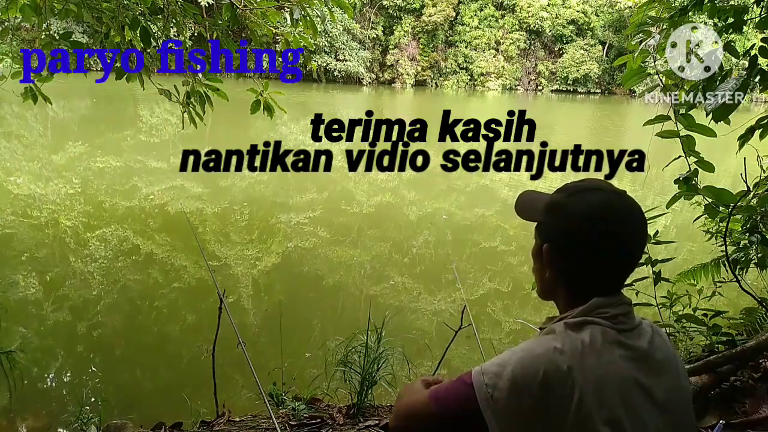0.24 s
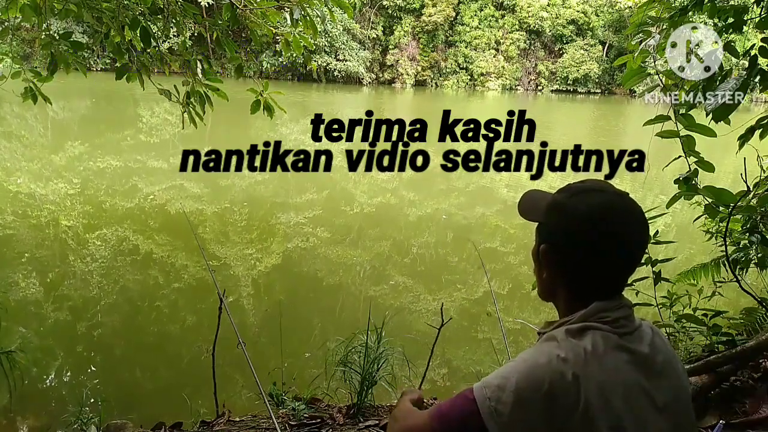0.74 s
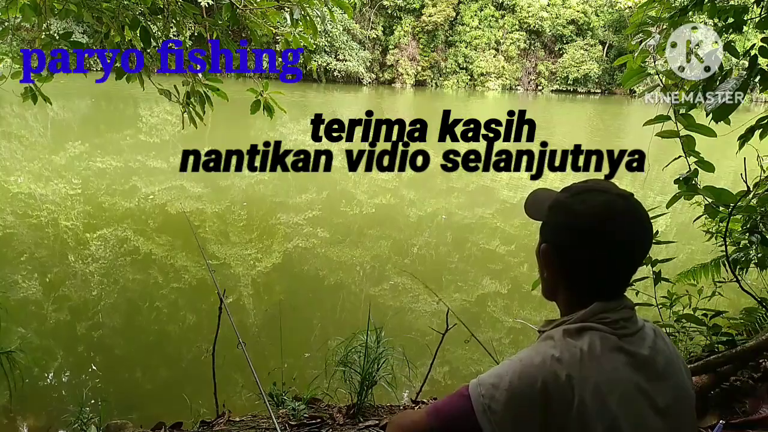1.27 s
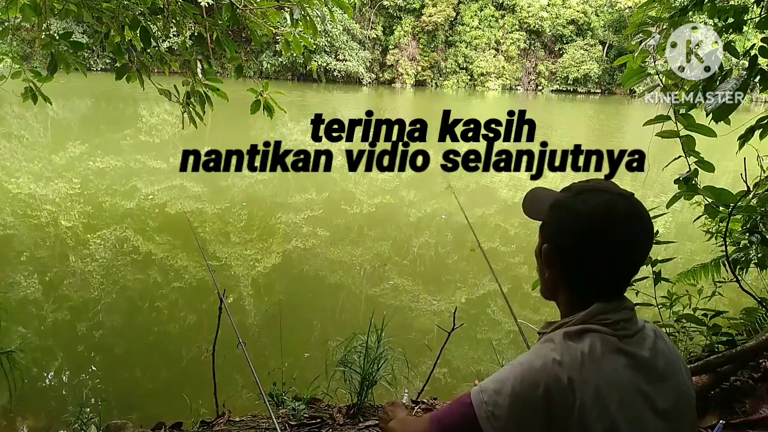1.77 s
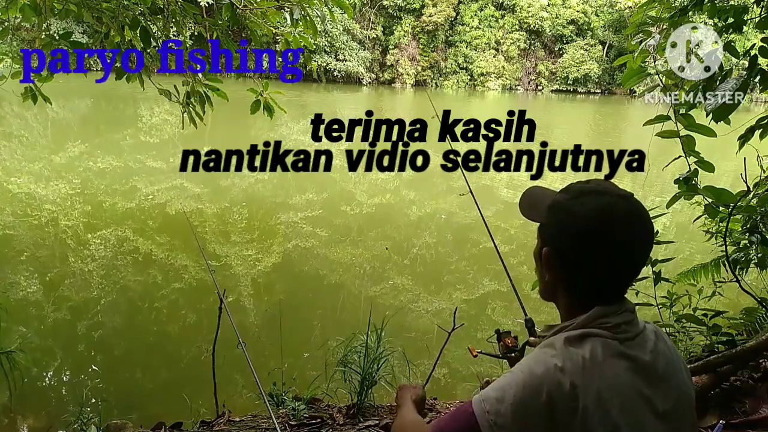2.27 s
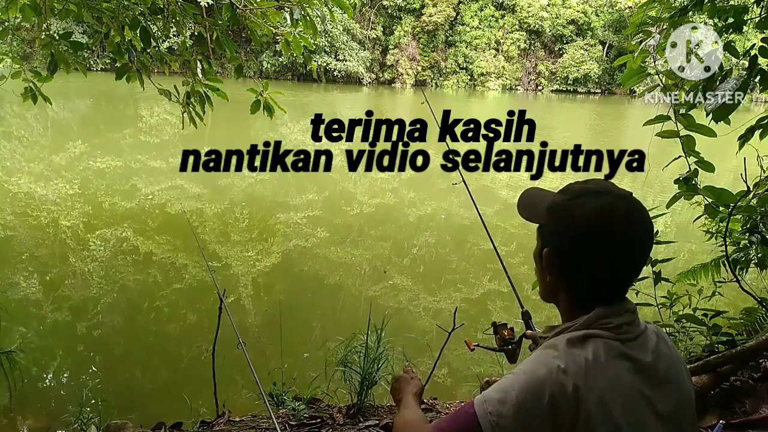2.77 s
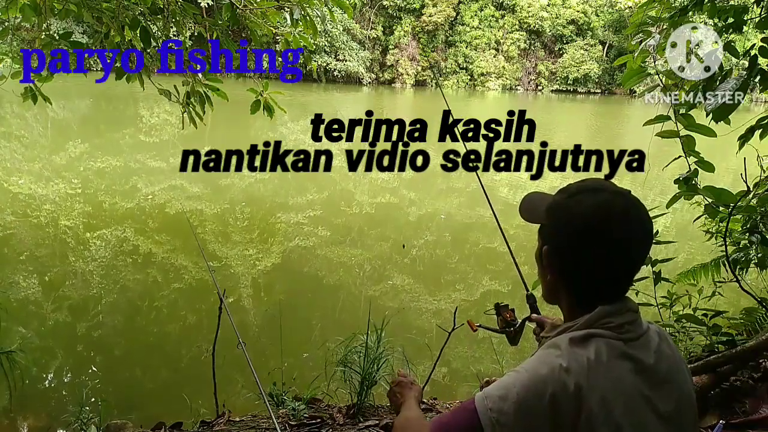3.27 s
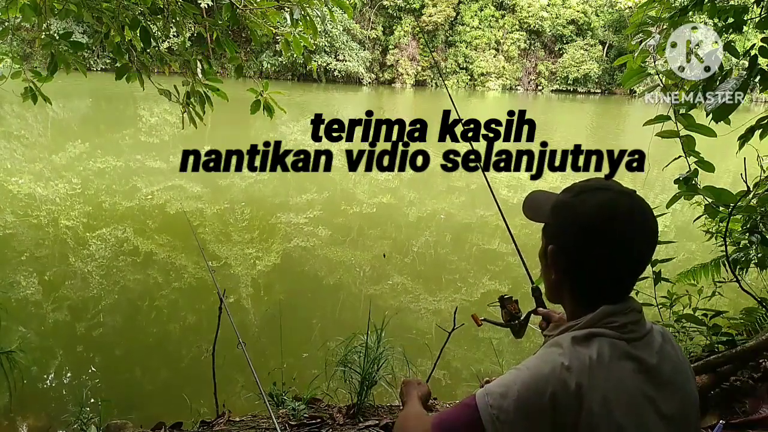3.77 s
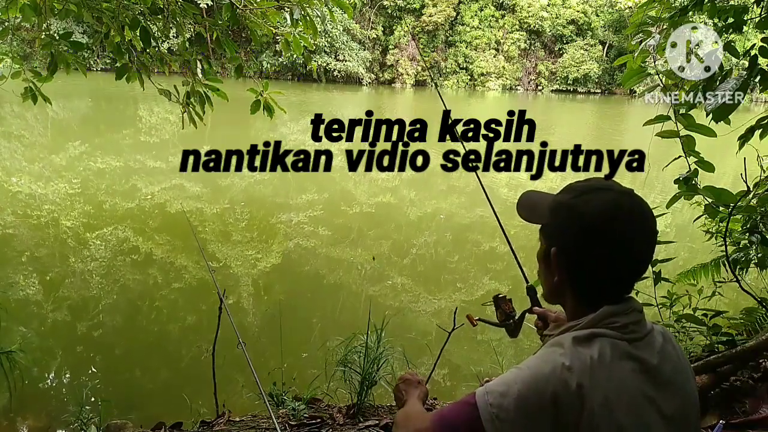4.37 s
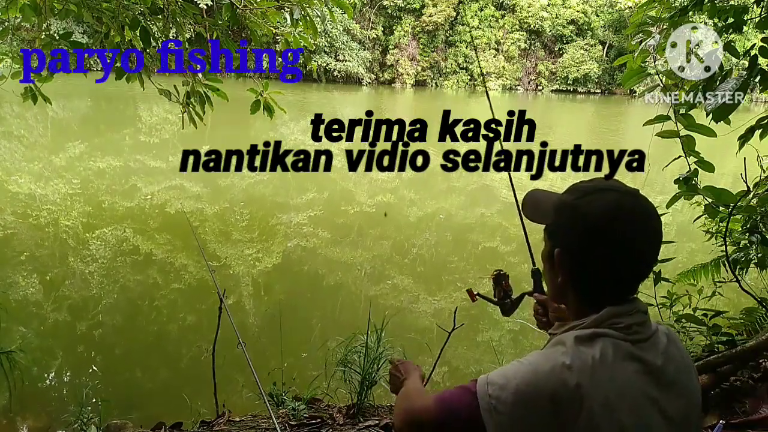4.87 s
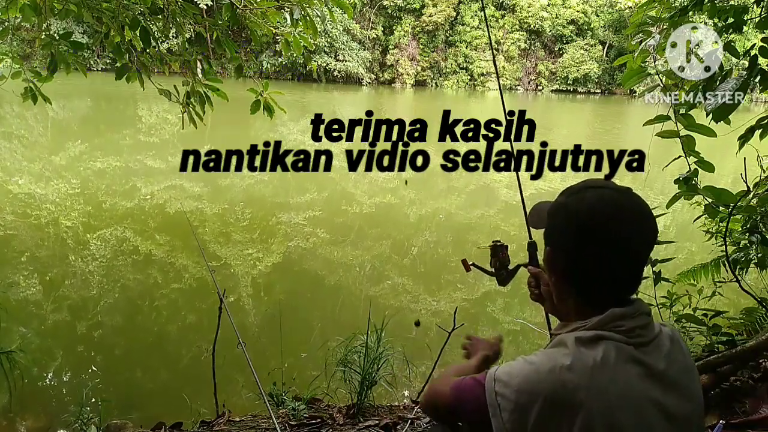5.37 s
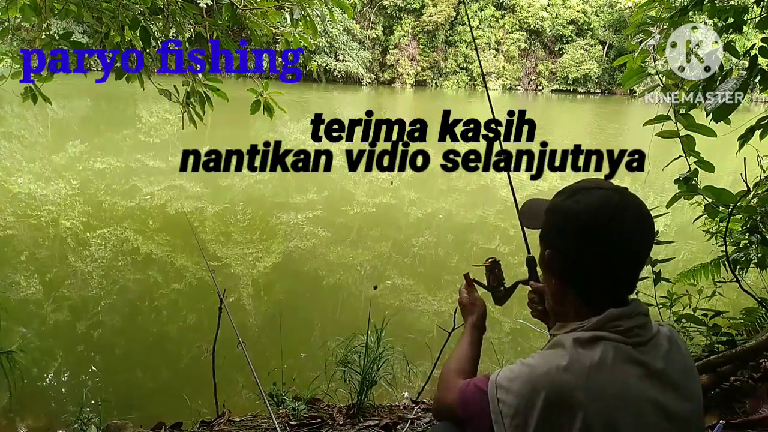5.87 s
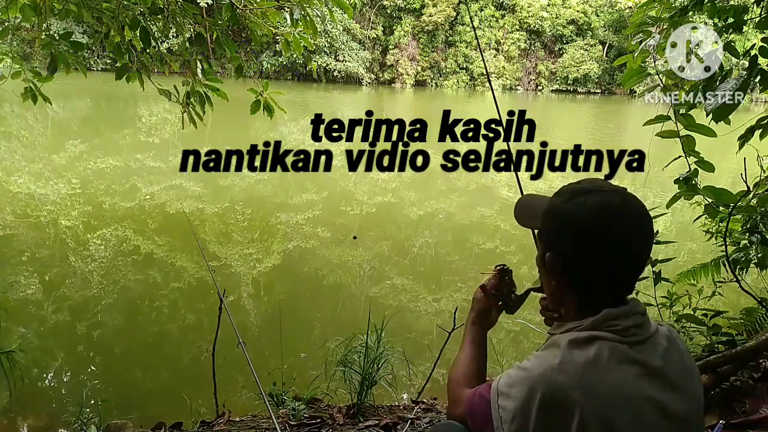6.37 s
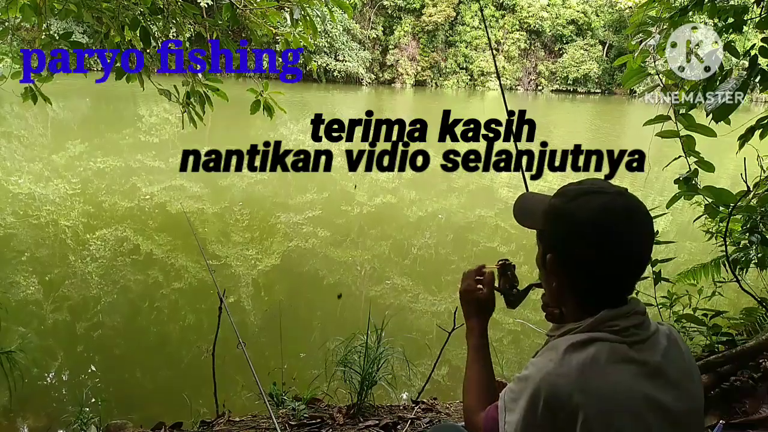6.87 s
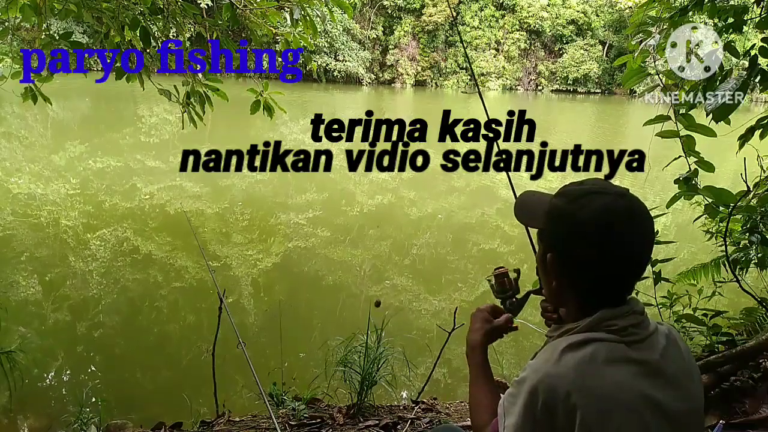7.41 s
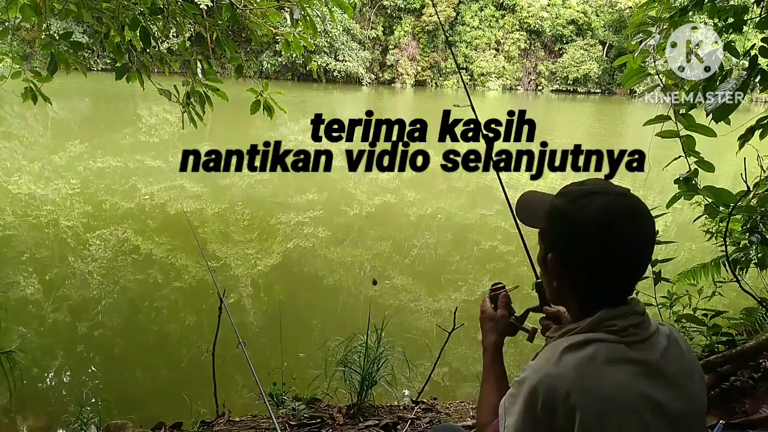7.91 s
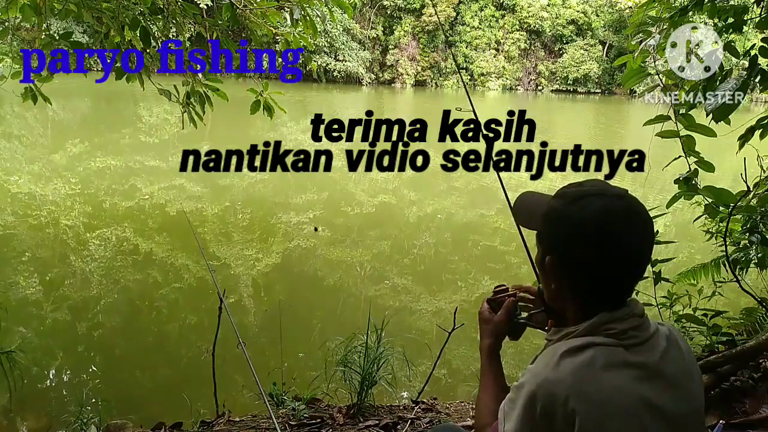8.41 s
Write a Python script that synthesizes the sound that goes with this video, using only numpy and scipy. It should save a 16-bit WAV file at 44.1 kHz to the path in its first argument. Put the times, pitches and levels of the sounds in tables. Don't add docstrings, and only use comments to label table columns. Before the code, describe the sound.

A continuous insect bed surrounds a lake shore: smooth cricket tones, a raspy cicada buzz and very high thin katydid whine. A small bird repeats a chip followed by a buzzy falling whistle about every 1.3 seconds, echoing off trees. A fishing rod close by ticks early, flicks and creaks around two to three and a half seconds, then ticks again later. Faint low wind rumble reaches the phone-like stereo microphone.

```python
import sys
import numpy as np
from scipy import signal
from scipy.fft import rfft, irfft, next_fast_len
from scipy.io import wavfile
from scipy.ndimage import map_coordinates

SR = 44100
rng = np.random.default_rng(int(sys.argv[2]) if len(sys.argv) > 2 else 0)


def store_wav(level_fs):
    pcm = np.round(np.clip(np.atleast_2d(level_fs), -1, 1) * 32767)
    wavfile.write(sys.argv[1], SR, pcm.T.astype(np.int16))


def elevation(decibels):
    levels = np.asarray(decibels, float)
    return 10 ** (levels / 20)


N = 381465


def clock():
    return np.arange(N) / SR


def unit(x):
    return x / np.sqrt(np.mean(np.abs(x) ** 2) + 1e-20)


def along(points, hz):
    f, v = np.transpose(points)
    return np.interp(np.log(hz + .1), np.log(f + .1), v)


def curves(rows):
    s, *cols = np.transpose(rows)
    return [np.interp(clock(), s, c) for c in cols]


def gate(rows, fade):
    t = clock()
    return np.clip(np.minimum(t - rows[0][0], rows[-1][0] - t) / fade, 0, 1)


def coarse(rate, channels=1):
    knots = rng.standard_normal((channels, 4096))
    at = np.arange(0, N + 16, 16) * rate / SR
    return np.array([map_coordinates(k, [at], order=2, mode="wrap") for k in knots])


def wobble(rate, channels=1):
    return np.repeat(coarse(rate, channels), 16, axis=1)[:, :N]


def filtered(x, response):
    m = next_fast_len(N + SR // 2)
    return irfft(rfft(x, m) * response(np.fft.rfftfreq(m, 1 / SR)), m)[..., :N]


def noise(spectrum, alike=0., lead=0.):
    own, common = rng.standard_normal((2, N)), rng.standard_normal(N)
    share = np.clip(alike, 0, 1)
    turn = np.exp(.5j * lead * np.array([[-1], [1]]))
    both = filtered(np.array([common, common]), lambda hz: elevation(along(spectrum, hz)) * turn)
    apart = filtered(own, lambda hz: elevation(along(spectrum, hz)))
    return unit(np.sqrt(share) * both + np.sqrt(1 - share) * apart)


def turns(hz):
    return 2 * np.pi * np.cumsum(np.broadcast_to(hz, N)) / SR


def wings(hz, db, scatter_hz, strokes=0, depth=0, pan_db=0, direct=0):
    a = coarse(scatter_hz, channels=4)
    share = np.clip(direct, 0, 1)
    leafy = unit(a[:2] + 1j * a[2:])
    straight = np.exp(1.2j * coarse(9, channels=2))
    paths = np.sqrt(1 - share) * leafy + np.sqrt(share) * straight
    stroke_rate = strokes * (1 + .03 * coarse(2)[0])
    paths *= 1 + depth * np.sin(2 * np.pi * np.cumsum(stroke_rate) * 16 / SR)
    paths = unit(paths) * elevation(pan_db * np.array([[.5], [-.5]]))
    paths = np.repeat(paths, 16, axis=1)[:, :N]
    return (paths * (np.sqrt(2) * elevation(db) * np.exp(1j * turns(hz)))).real


# frequency in Hz, t60 in seconds.
FOREST_T60 = [(500, 0.9), (4000, 1), (9000, 0.13)]


def forest(x, length=SR):
    hz, t, z = signal.stft(rng.standard_normal((2, length)), SR, nperseg=256)
    decay = elevation(-60 * t / along(FOREST_T60, hz)[:, None])
    tail = signal.istft(z * decay, SR, nperseg=256)[1]
    return signal.fftconvolve(x[None], tail / np.linalg.norm(tail[0]), axes=1)[:, :N]


# time in seconds, strength in dB.
BREEZE = [
    (0, -54.5),
    (1.4, -55),
    (2.2, -56),
    (3.4, -53.5),
    (4.8, -54.5),
    (5.6, -56),
    (7.4, -55),
    (8.65, -54),
]
# frequency in Hz, density in dB per Hz.
BUFFET_SPECTRUM = [(1, -12), (4, -9), (10, -13), (20, -15.5), (40, -41), (80, -46), (200, -120)]
RUMBLE_SPECTRUM = [(10, -43.5), (25, -2.5), (45, 1.5), (62, 2.5), (90, -7.5), (140, -20), (250, -37.5),
                   (500, -120)]
RUSTLE_SPECTRUM = [(40, -30), (110, 0), (200, -4.5), (450, -9.5), (800, -19), (1200, -24), (2000, -31.5),
                   (4000, -120)]
FAR_CHORUS_SPECTRUM = [(500, -39), (1200, -11), (2000, -4.5), (2700, -3), (3400, 0), (4100, -3), (4600, -5),
                       (5700, -7), (8600, -3), (9000, 0.5), (9500, -2.5), (10600, -11), (11800, -28),
                       (13900, -24)]
# frequency in Hz, left over right in dB.
PORT_BALANCE = [(20, -2), (100, -3), (400, -0.5), (4000, -0.5), (8500, 0.5), (10000, -2), (14000, 5.5)]


def air():
    strength_db = curves(BREEZE)[0]
    gust_db = strength_db - strength_db.mean()
    buffet_db = -45.5 + 0.66 * gust_db
    rumble_db = -53.5 + gust_db
    rustle_db = -61 + 0.25 * gust_db - 0.27 * clock()
    out = elevation(buffet_db) * noise(BUFFET_SPECTRUM)
    out += elevation(rumble_db) * noise(RUMBLE_SPECTRUM, alike=0.55, lead=0.71)
    out += elevation(rustle_db + .6 * wobble(4.4)) * noise(RUSTLE_SPECTRUM, alike=0.11)
    out += elevation(-62 + 0.86 * wobble(9, channels=2)) * noise(FAR_CHORUS_SPECTRUM)
    return filtered(out, lambda hz: elevation(along(PORT_BALANCE, hz) * np.array([[.5], [-.5]])))


KATYDID_HZ = [12960, 13180, 13425, 13645, 13835, 13900, 14010, 14190, 14240, 14505, 14690, 14950]
# level in dB, scatter in Hz.
KATYDID_LINES = [(-98, 250), (-96, 120), (-88, 70), (-83, 50), (-90, 70), (-92, 70), (-93, 90), (-83, 40),
                 (-84, 40), (-95, 140), (-98, 140), (-100, 250)]
# time in seconds, lift in dB.
FLARES = [
    (.5, 6),
    (1.9, 12),
    (7, 10),
    (8.65, 12),
]


def katydids():
    t, level_db, flare_s = clock(), 2.5, 0.61
    low_db = -5 + sum(db * np.exp(-((t - s) / flare_s) ** 2) for s, db in FLARES)
    out = np.zeros((2, N))
    for hz, (line_db, scatter_hz) in zip(KATYDID_HZ, KATYDID_LINES):
        lift = low_db * np.clip((13600 - hz) / 400, 0, 1)
        drifting_hz = hz + 28 * wobble(1.0)[0]
        db = level_db + line_db + lift + 1.5 * wobble(1.8)[0]
        out += wings(drifting_hz, db, scatter_hz, pan_db=-2.0, direct=0.19)
    return out


CRICKET_HZ = [2945, 2968, 2995, 3020, 3048, 3353, 3407, 3456, 3547, 3606, 3676]
# level in dB, scatter in Hz, strokes per second, stroke depth 0-1,
# left over right in dB, direct share 0-1.
CRICKET_TONES = [(-74, 45, 0, 0, 0, 0), (-68, 40, 18, .2, 0, 0), (-70, 50, 0, 0, 0, 0),
                 (-70, 45, 41, .2, 0, 0), (-74, 45, 0, 0, 0, 0), (-78.5, 25, 0, 0, 2, .5),
                 (-77, 35, 0, 0, 2, .4), (-76.5, 30, 0, 0, 2, .45), (-71.5, 24, 26.4, .3, .4, .7),
                 (-83, 30, 0, 0, 0, .1), (-81, 40, 0, 0, 0, .1)]
# wing tone in Hz, creep in Hz per second, first level in dB, settled level in dB.
TREE_CRICKETS = [
    (5255, 14, -66.5, -86),
    (5325, -1, -76, -81),
    (5120, 10, -84, -80),
    (5070, 5, -88, -81),
]
# start in seconds, attack in seconds, tone in Hz, climb in Hz per second, level in dB,
# swell in dB per second.
LATE_SINGER = (8.0, .1, 12780, 450, -86, 9)


def crickets():
    t = clock()
    out = elevation(3) * sum(wings(hz, *row) for hz, row in zip(CRICKET_HZ, CRICKET_TONES))

    settle_s, rest_at_s, rest_s = 3, 4.9, .7
    rest_db = -4 * np.exp(-((t - rest_at_s) / rest_s) ** 2)
    singers = []
    for tone_hz, creep, first_db, settled_db in TREE_CRICKETS:
        hz = tone_hz + creep * np.minimum(t, 6)
        singers.append((hz, settled_db + (first_db - settled_db) * np.exp(-t / settle_s)))
    (near_hz, near_db), *far = singers
    out += wings(near_hz, near_db, scatter_hz=30, strokes=9.3, depth=.65, pan_db=6, direct=.85)
    out += sum(wings(hz, db + rest_db, scatter_hz=45, pan_db=4, direct=.3) for hz, db in far)

    waver_from_s, waver_s, climb_s = 1.87, 1.645, 1.0
    dip = np.sin(np.pi * np.maximum(t - waver_from_s, 0) / waver_s) ** 2
    siren_hz = 9275 - 150 * np.maximum(1 - t / climb_s, 0) - 135 * dip - 11 * t
    siren_db = np.interp(t, [0, 3.8], [-68.5, -63.5])
    out += wings(siren_hz, siren_db, scatter_hz=120, pan_db=-1.5)

    start_s, attack_s, hz, climb, db, swell = LATE_SINGER
    since = np.maximum(t - start_s, 0)
    late = wings(hz + climb * since, db + swell * since, scatter_hz=597, pan_db=-4)
    return out + np.minimum(since / attack_s, 1) * late


# frequency in Hz, density in dB per Hz.
CICADA_BODY = [(5000, -71), (6000, -41), (6600, -7), (7000, 0), (7400, 4), (7750, -0.5), (8100, -6),
               (8500, -32), (9500, -35), (12000, -120)]


def cicada():
    cycle = turns(19.6 * (1 + 0.0042 * wobble(0.96)[0]))
    bursts = 1 + .5 * np.cos(cycle) + .5 * np.cos(4 * cycle) + 0.3 * np.cos(5 * cycle + 1)
    clicks = bursts * rng.standard_normal(N) * (rng.random(N) < 1500 / SR)
    straight = 0.76 * unit(clicks) * np.array([[1], [.3]])
    scattered = unit(forest(clicks, SR // 2))
    blend = straight + scattered + 1.52 * rng.standard_normal((2, N))
    body = unit(filtered(blend, lambda hz: elevation(along(CICADA_BODY, hz))))
    return body * elevation(-57 + 0.4 * wobble(12, channels=2)) * elevation([[1.5], [-1.5]])


# time of the downward step in seconds, time held before it in seconds,
# held pitch in Hz, held level in dB, low level in dB.
WHISTLES = [
    (.485, 0.19, 4302, -55, -56),
    (1.792, .29, 4163, -56.5, -60.5),
    (2.889, .27, 4194, -62, -56.5),
    (4.19, 0.21, 4172, -57.5, -62),
    (5.48, 0.22, 4140, -62.5, -58.5),
    (6.871, 0.18, 4120, -67, -60),
    (8.53, .08, 3980, -60, -60.5),
]
# start in seconds, pitch in Hz, bend in Hz, level in dB.
CHIPS = [(.033, 3780, 0, -58), (1.3, 3760, -70, -61), (1.303, 2700, -80, -66), (2.398, 3760, 150, -56),
         (3.74, 3790, -20, -56), (5.09, 3850, -60, -63), (5.08, 3250, -150, -70), (6.488, 2650, -50, -63),
         (6.501, 3250, 350, -61), (8.156, 3720, -20, -63), (.01, 3150, 0, -65)]
# start in seconds, note 0 low or 1 high, level in dB.
ANSWERS = [
    (3.384, 0, -68),
    (3.467, 1, -67),
    (3.567, 0, -62.5),
    (3.676, 1, -64),
    (8.43, 0, -68),
    (8.52, 1, -62),
    (8.607, 0, -63),
]


def birds():
    t, song = clock(), np.zeros(N)
    beat = 1 + .6 * np.cos(turns(112 * (1 + .06 * wobble(20)[0])))
    buzz = beat * elevation(2.7 * wobble(40)[0])
    warble_hz, waver = 60 * wobble(80)[0], wobble(350)[0]

    def sing(hz):
        return np.sin(2 * np.pi * np.cumsum(hz) / SR)

    step_s, swell_s, low_hold_s = .025, .11, .07
    for s, held, hz, held_db, low_db in WHISTLES:
        on = (t > s - held) & (t < s + .2)
        u = t[on] - s
        low = .5 + .5 * np.tanh(u / step_s)
        young = np.clip(1 - (u + held) / swell_s, 0, 1)
        pitch = hz - 30 * young - 240 * low - 800 * np.maximum(u, 0)
        db = held_db + (low_db - held_db) * low - 13 * young
        db -= 260 * np.maximum(u - low_hold_s, 0)
        attack = np.minimum((u + held) / 0.0086, 1)
        song[on] += attack * elevation(db) * buzz[on] * sing(pitch + warble_hz[on])

    calls = [(s, .043, hz, bend, db, 120) for s, hz, bend, db in CHIPS]
    calls += [(s, .087, 3190 if high else 2775, 0, db, 50) for s, high, db in ANSWERS]
    for s, length, hz, bend, db, spread_hz in calls:
        on = (t > s) & (t < s + length)
        u = (t[on] - s) / length
        envelope = np.clip(np.minimum(u, 1 - u) * length / 0.015, 0, 1)
        song[on] += envelope * elevation(db + 3.0) * sing(hz + bend * u + spread_hz * waver[on])

    straight = song * elevation([[-2], [-6]])
    return elevation(0.5) * (straight + elevation(-1) * forest(song))


# time in seconds, pitch in Hz, level in dB.
FLICK = [
    (2.1, 2880, -77),
    (2.118, 2716, -65.5),
    (2.135, 2100, -65),
    (2.155, 1660, -65),
    (2.19, 1574, -83),
    (2.21, 1500, -89),
]
# start in seconds, length in seconds, peak in dB, second mode in dB, high modes in dB.
CREAKS = [
    (1.88, .2, -76, -12, -3),
    (2.15, .05, -71, -12, -2),
    (2.22, .03, -73, 0, -6),
    (2.28, .1, -71, -2, -5),
    (2.4, .13, -66, -3, -12),
    (2.58, .13, -81, -5, -2),
    (2.98, .24, -79, -9, -2),
    (3.42, .14, -69, -7, -12),
    (3.6, .14, -82, -2, -6),
]
# frequency in Hz, width in Hz, level in dB.
ROD_MODES = [(638, 165, 3.5), (954, 78, 2.5), (1620, 190, -1.5), (2100, 400, -1.5), (2660, 560, 2.5)]
# time in seconds, peak in dB, body tone in Hz.
TICKS = [
    (.145, -53, 800),
    (.584, -53, 600),
    (4.52, -63, 1500),
    (5.398, -50, 740),
    (5.563, -50, 800),
    (5.563, -59, 2100),
    (5.881, -58, 2050),
    (5.881, -64, 4400),
    (7.467, -48, 490),
]


def rod():
    hz, db = curves(FLICK)
    out = wings(hz, db + 4, scatter_hz=686.0)
    out += wings(hz * .37, db + 2, scatter_hz=60, direct=.7)
    close, rasp = gate(FLICK, 0.0055) * out[0], np.zeros(N)

    slip_count = np.floor(turns(42 * elevation(3 * wobble(15)[0])) / (2 * np.pi))
    slips = np.diff(slip_count, prepend=0) * elevation(2 * rng.standard_normal(N))
    modes = []
    for centre, width, db in ROD_MODES:
        def resonance(f):
            return (1j * f * width / (centre * centre - f * f + 1j * f * width)) ** 2
        modes.append(unit(filtered(slips, resonance)) * elevation(db))

    let_go_s = .03
    for s, length, db, second_db, high_db in CREAKS:
        on = slice(round(s * SR), round((s + length + let_go_s) * SR))
        u = clock()[on] - s
        ends = np.minimum(np.minimum(u, u[-1] - u) / let_go_s, 1)
        load = ends * elevation(db - 5 * np.maximum(1 - u / length, 0))
        first = np.sqrt(np.clip(1 - elevation(2 * second_db), .05, 1))
        close[on] += load * (first * modes[0][on] + elevation(second_db) * modes[1][on])
        rasp[on] += load * elevation(high_db) * sum(m[on] for m in modes[2:])

    t = np.arange(SR // 10) / SR
    ping = elevation(-60 * t / .03) * (1 - np.exp(-t / .0015))
    for s, db, hz in TICKS:
        close[round(s * SR):][:len(t)] += elevation(db) * ping * np.sin(2 * np.pi * hz * t)

    scattered = forest(elevation(-12) * close + rasp, SR // 2)
    straight = np.array([close, -np.roll(close, 12)])
    return elevation(4.5) * (straight + scattered)


def scene():
    return air() + katydids() + crickets() + cicada() + birds() + rod()


def band_limit(x):
    return signal.sosfilt(signal.butter(12, 15030, fs=SR, output="sos"), x)


# frequency in Hz, threshold in dB over the 10 kHz hiss.
FAINTEST_KEPT = [(300, -40), (900, -7), (1300, -6), (3000, -7), (4700, -4.5), (5600, -4.5), (8000, -14),
                 (10500, -6), (12000, -9), (14000, -11)]


def record(dry):
    mid_side = np.array([dry[0] + dry[1], dry[0] - dry[1]]) / 2
    hz, t, z = signal.stft(mid_side, SR, window="cosine", nperseg=2048)
    hz = hz[:1024]
    power = np.mean(np.abs(z[:, :1024]).reshape(2, 256, 4, -1) ** 2, axis=2)
    power = np.repeat(power, 4, axis=1)
    hiss = np.mean(power[:, (hz > 9500) & (hz < 10000)])
    vary_db = hz[:, None] / 4000 * rng.standard_normal((1, len(t)))
    threshold_db = along(FAINTEST_KEPT, hz)[:, None] + vary_db
    z[:, :1024] *= power > hiss * elevation(2 * threshold_db)
    mid, side = signal.istft(z, SR, window="cosine", nperseg=2048)[1][:, :N]
    return band_limit(np.array([mid + side, mid - side]))


dry = scene()
out = record(dry)
store_wav(out)
```